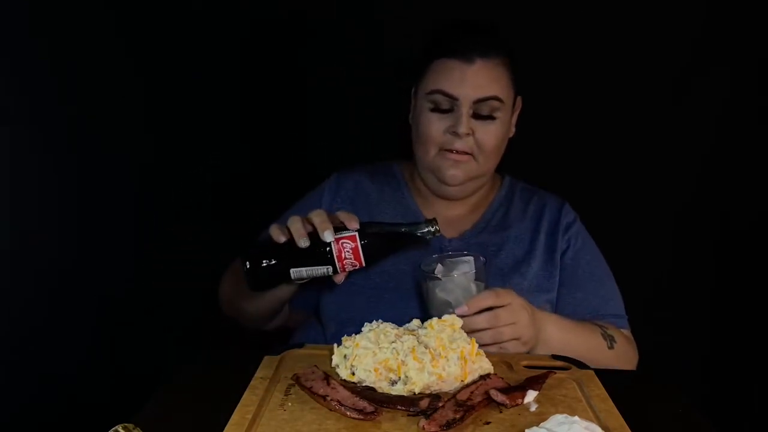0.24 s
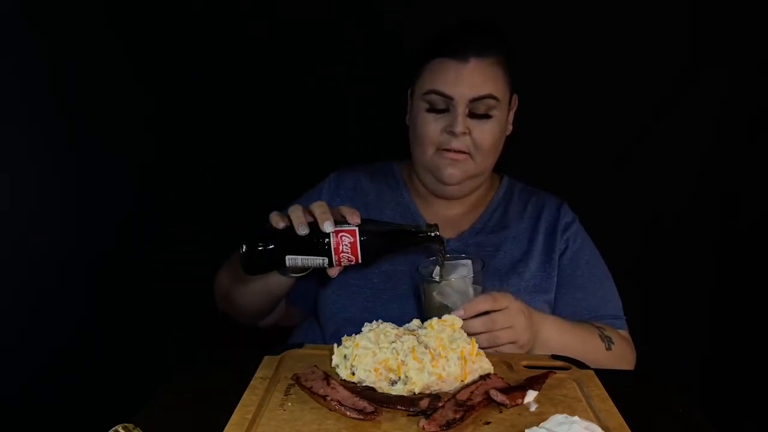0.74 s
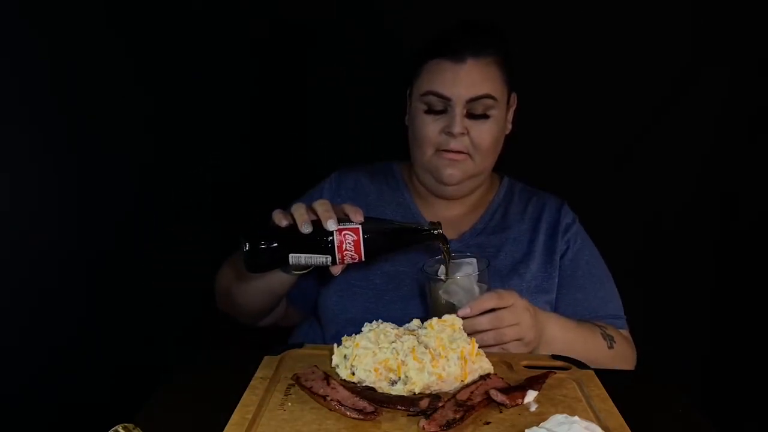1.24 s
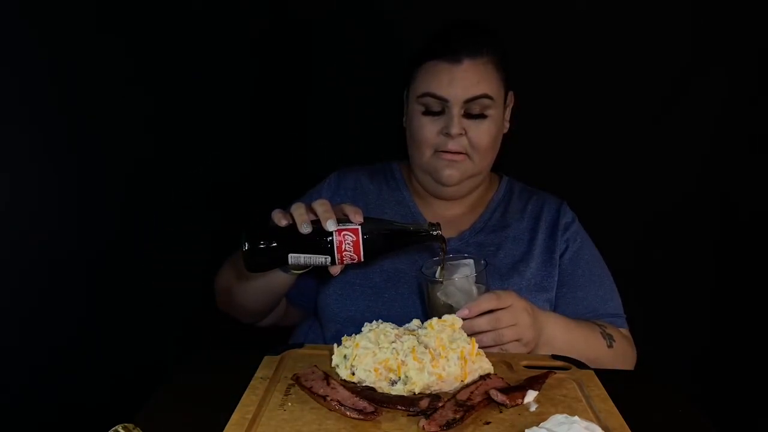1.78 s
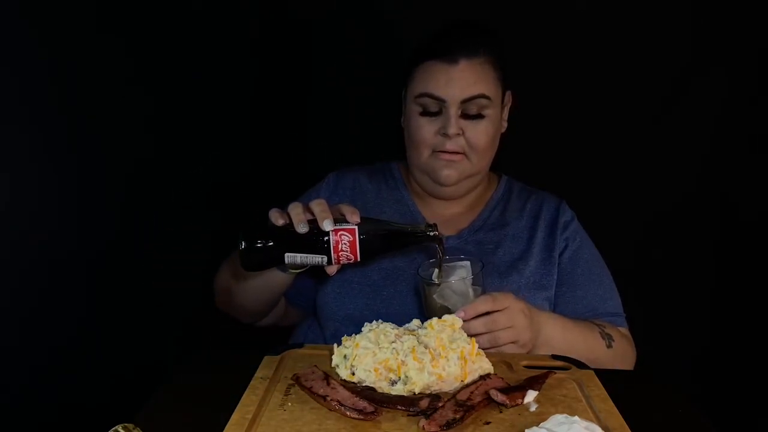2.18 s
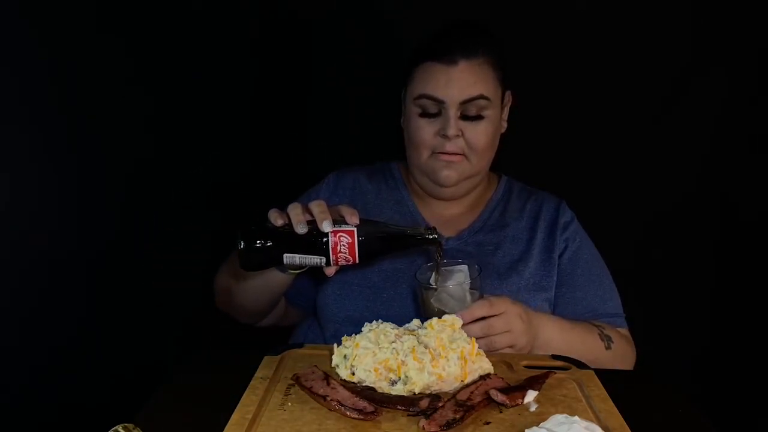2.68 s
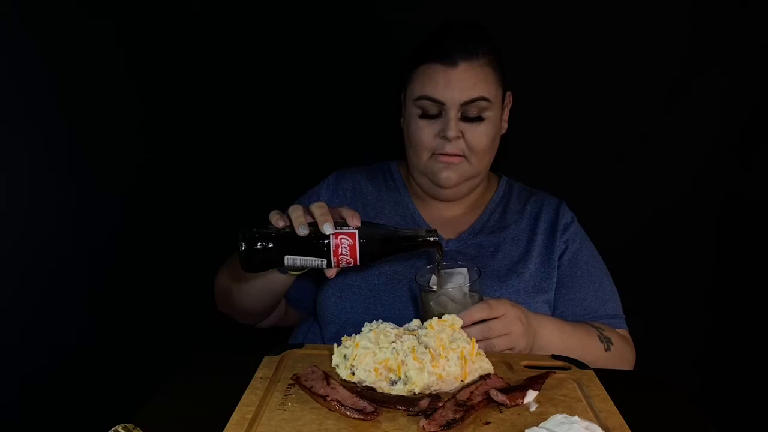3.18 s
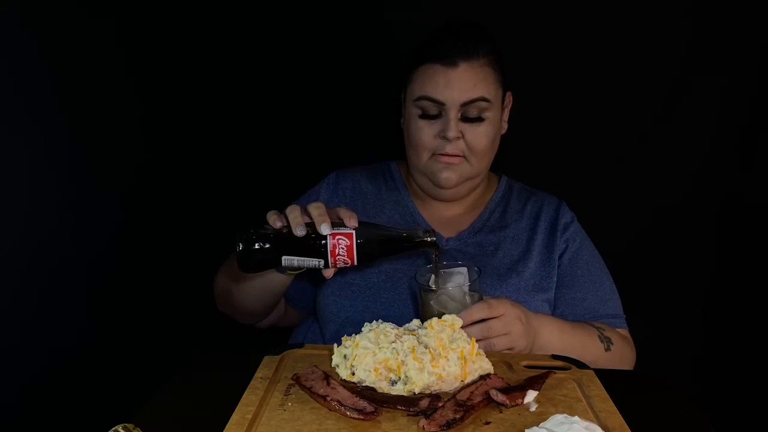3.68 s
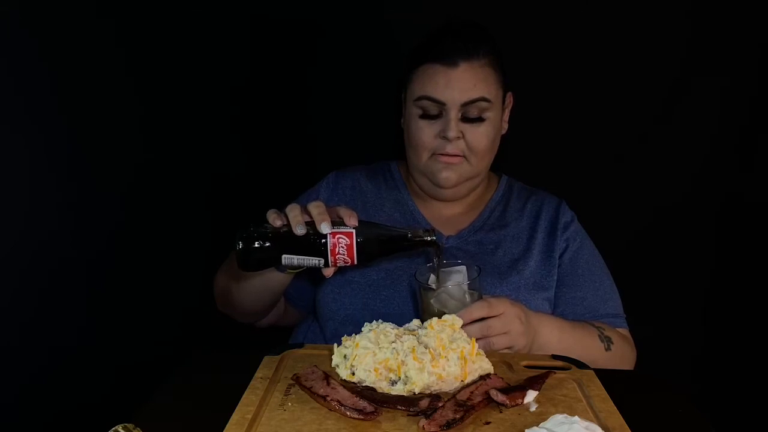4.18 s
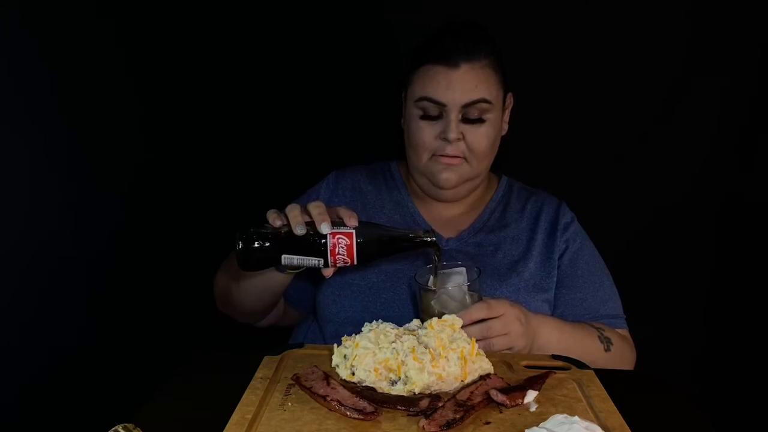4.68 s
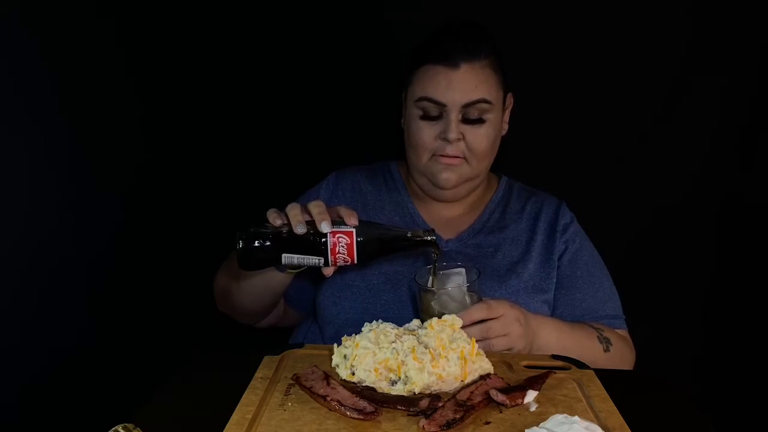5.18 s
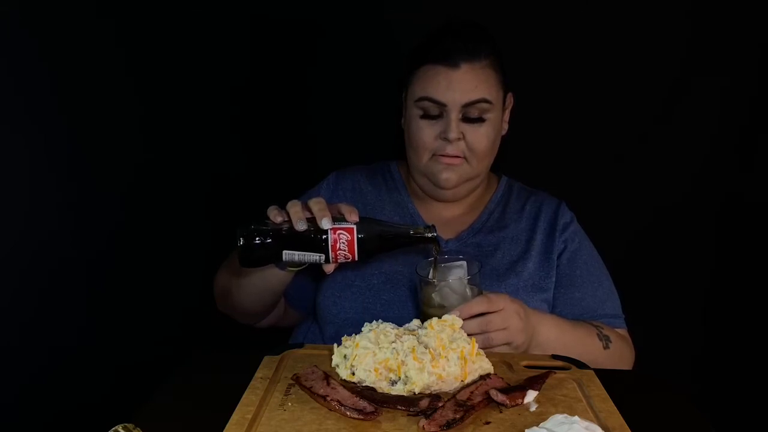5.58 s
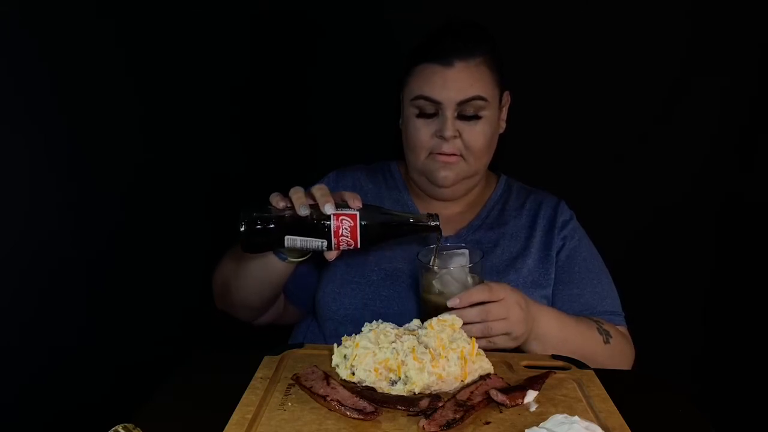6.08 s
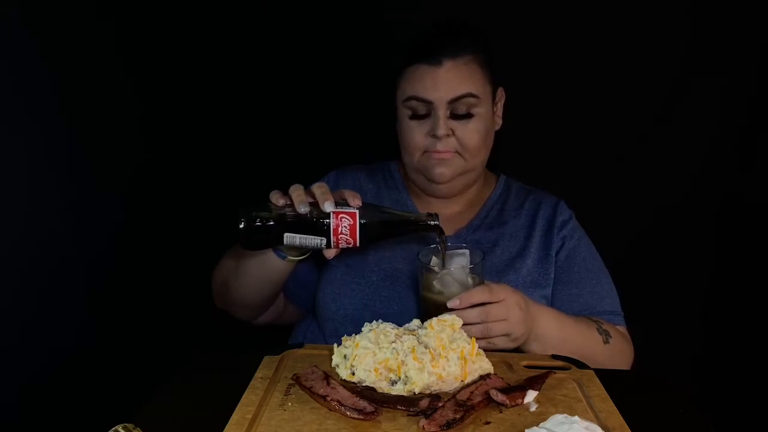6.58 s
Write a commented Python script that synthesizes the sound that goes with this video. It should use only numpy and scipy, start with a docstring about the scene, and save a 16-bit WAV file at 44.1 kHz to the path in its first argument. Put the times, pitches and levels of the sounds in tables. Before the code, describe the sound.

In a quiet room with a deep steady appliance hum, a seat creaks several times in quick raspy knocks. A fizzy drink then starts to pour over ice in a glass: small plops, sharp ice cracks and a thin hiss that grows into a dense bubbling fizz. Cubes knock and tick as they settle. Close microphone, short dry room, no speech.

```python
"""Fizzy drink poured over ice

A fizzy drink is poured slowly from a glass bottle over ice in a tumbler, in a quiet room with humming appliances.
Steady tones and air noise hum; a seat creaks in slips of rasping noise and knocking frame modes.
Random bursts through narrow bands make the fizz, its colour passing through lifts and hollows.
Ice cracks and knocks as dying sines, drops plop as short rising tones, and a noise tail gives the room."""
import sys
import numpy as np
from scipy import signal
from scipy.fft import rfft, irfft, next_fast_len
from scipy.io import wavfile

SR = 44100
rng = np.random.default_rng(int(sys.argv[2]) if len(sys.argv) > 2 else 0)


def wav_record(signal):
    """Record a signal, one row per channel, as 16-bit PCM in the file named by sys.argv[1]."""
    frames = np.transpose(np.atleast_2d(signal))
    bounded = np.clip(frames, -1, 1)
    # unit amplitude maps onto the largest positive 16-bit level
    quanta = np.round(bounded * 32767).astype(np.int16)
    wavfile.write(sys.argv[1], SR, quanta)


N = 301423
TIME = np.arange(N) / SR
STEP = 40   # samples between points of slow curves
COARSE = TIME[::STEP]


def amp(db):
    """Gain of a level in dB."""
    return 10 ** (np.asarray(db) / 20)


def rms_one(x):
    """Scales a sound to rms 1."""
    return x / np.sqrt(np.mean(x ** 2) + 1e-20)


def smooth_gain(coarse_db):
    """Gain at every sample from levels on the coarse grid."""
    return np.interp(TIME, COARSE, amp(coarse_db))


def drift(rate_hz):
    """Slow random wander on the coarse grid, rms 1, from noise through two equal low-pass poles."""
    pole = np.exp(-2 * np.pi * rate_hz * STEP / SR)
    settle = 2000   # points run in and thrown away
    slow = signal.lfilter([1], [1, -2 * pole, pole * pole], rng.standard_normal(len(COARSE) + settle))
    return rms_one(slow[-len(COARSE):])


def coloured_noise(spectrum, size):
    """Noise with a given spectrum, drawn over log frequency; rms 1."""
    hz, db = np.transpose(spectrum)
    grid = np.fft.rfftfreq(size, 1 / SR) + 1   # 1 Hz up, to keep the log finite
    gain = amp(np.interp(np.log(grid), np.log(hz), db))
    return rms_one(irfft(rfft(rng.standard_normal(size)) * gain, size))


def ring(t, hz, t60):
    """A sine that dies by 60 dB in t60 seconds."""
    return np.sin(2 * np.pi * hz * t) * amp(-60 * t / t60)


def add(out, s, sound):
    """Mixes a short sound in at a time in seconds."""
    at = round(s * SR)
    out[at:at + len(sound)] += sound[:N - at]


# Steady tones of mains, motor and fans. Each row: frequency in Hz, mean rms level in dB.
HUM_TONES = [(17.2, -31), (17.95, -37), (37.5, -47), (59.95, -45), (85.7, -49), (120, -51.5), (149.4, -59),
             (161.5, -61), (170.2, -57), (171.4, -55), (181, -57), (186.5, -60), (227, -59), (240, -45.3),
             (284, -56), (298.6, -58), (336, -62), (360, -60), (385, -61), (448, -58), (480, -62),
             (560, -67), (585, -63), (738, -67)]
# Spectrum of air and building noise. Each row: frequency in Hz, relative level in dB per Hz.
AIR_SPECTRUM = [(8, -2.5), (22, -2.5), (30, -1), (40, -17.5), (70, -15), (95, -19), (135, -32.5),
                (175, -21), (210, -26.5), (300, -27), (450, -30.5), (590, -34), (800, -35), (1200, -40),
                (3000, -44), (6000, -62), (9000, -63), (15500, -72)]
# Brief dips in the level of the low hum near 57 Hz. Each row: centre in seconds, depth in dB (negative).
LOW_HUM_DIPS = [(0.55, -14), (1.62, -13), (2.758, -4), (5.5, -6.5), (6.13, -11)]
LOW_HUM_HZ, LOW_HUM_DB = 56.75, -29.5
DIP_S = 0.057   # from the centre of a dip to 1/e of its depth
FLUTTER_HZ, FLUTTER_WIDTH_HZ, FLUTTER_DB = 58.85, 3.2, -45
AIR_DB = -31.5


def hum():
    """Low motor hum whose level dips briefly, wavering mains and fan tones, and broad air noise."""
    low_db = LOW_HUM_DB + sum(db * np.exp(-((COARSE - s) / DIP_S) ** 2) for s, db in LOW_HUM_DIPS)
    out = np.sqrt(2) * smooth_gain(low_db) * np.sin(2 * np.pi * LOW_HUM_HZ * TIME)
    # a narrow unsteady rumble beats against the low hum
    edges = [FLUTTER_HZ - FLUTTER_WIDTH_HZ / 2, FLUTTER_HZ + FLUTTER_WIDTH_HZ / 2]
    band = signal.butter(2, edges, "band", fs=SR, output="sos")
    rumble = signal.sosfilt(band, rng.standard_normal(N + SR))[SR:]   # the first second settles the filter
    out += amp(FLUTTER_DB) * rms_one(rumble)
    for hz, db in HUM_TONES:
        waver = smooth_gain(db + 0.9 * drift(1.2))
        out += np.sqrt(2) * waver * np.sin(2 * np.pi * (hz * TIME + rng.random()))
    return out + amp(AIR_DB) * coloured_noise(AIR_SPECTRUM, next_fast_len(N))[:N]


# Creaks of the seat, and a short rasp at 1.28 s as the drink rises. Each row: start in seconds,
# base level in dB, knock level relative to base in dB, build-up in seconds, catch level in dB,
# treble lift of the rasp in dB.
CREAKS_AND_RASP = [(0, -27, 3, 0.0061, -50, -6), (0.0596, -27, 4.5, .007, -46, -1.5),
                   (0.1185, -32, 10.5, 0.0056, -42, 0), (.167, -33, 9, 0.0069, -39, 0),
                   (0.212, -35.5, 10, 0.0079, -38, 0.5), (.394, -30, 3.5, 0.0031, -37, -0.5),
                   (0.519, -42, 4, 0.0034, -60, -4), (1.284, -37, -25, 0.0039, -52, 4),
                   (4.245, -31, -13, 0.0085, -50, 0)]
# Modes of the seat frame. Each row: frequency in Hz, relative level in dB, t60 in seconds.
FRAME_MODES = [(246.5, -3.5, 0.28), (340, -5.5, 0.071), (431, -2, 0.085), (480, -1, 0.054),
               (570, -2, 0.068), (675, -10, 0.032), (1400, -16, 0.04), (2430, -20, 0.05)]
# Spectrum of the rasp. Each row: frequency in Hz, relative level in dB per Hz.
RASP_SPECTRUM = [(250, 8), (600, 3), (950, -6), (1400, 2.5), (1900, -2.5), (2400, -3.5), (4200, -11),
                 (5200, -9.5), (6300, -0.5), (7000, -7), (7650, -3.5), (8400, -4), (9300, -7.5),
                 (10100, -6.5), (10900, -10.5), (11700, -6.5), (13000, -15), (15800, -18)]
CATCH_HZ, CATCH_T60_S = [5240, 5500, 6000], 0.0054
RASP_TREBLE_HZ, RASP_HOLD_S = 3500, 0.0012
KNOCK_DELAY_S = 0.0062   # the knock follows just after the rasp begins


def creaks_and_rasp():
    """Each creak builds up as a rasp of noise and a knock on the frame's modes, then catches with a tick.

    The short rasp of the drink is made the same way, with its knock and tick very faint."""
    out, t = np.zeros(N), TIME[:SR // 4]
    for s, db, knock_db, build_s, catch_db, treble_db in CREAKS_AND_RASP:
        rise = np.clip(t / build_s, 0, 1) ** 0.76
        after = np.maximum(t - build_s - RASP_HOLD_S, 0)
        # a quick fall over a longer tail
        envelope = rise * (amp(-60 * after / 0.036) + 0.78 * amp(-60 * after / 0.29))
        colour = [(hz, level_db + treble_db * (hz > RASP_TREBLE_HZ)) for hz, level_db in RASP_SPECTRUM]
        rasp = coloured_noise(colour, len(t)) * envelope
        uneven_db = rng.normal(0, 2, len(FRAME_MODES))
        frame = sum(amp(mode_db + e) * ring(t, hz, t60) for (hz, mode_db, t60), e in zip(FRAME_MODES, uneven_db))
        knock = 0.5 * frame * (1 - np.exp(-t / 0.00085))
        tick = sum(ring(t, hz, CATCH_T60_S) for hz in CATCH_HZ)
        add(out, s, amp(db - 7.0) * rasp)
        add(out, s + KNOCK_DELAY_S, amp(db + knock_db) * knock)
        add(out, s + build_s, amp(catch_db) * tick)
    return out


# Passing lifts and hollows in the fizz's colour, some climbing as the glass fills. Each row:
# start in seconds, end in seconds, starting frequency in Hz, climb in octaves per second (negative falls),
# width in octaves from the centre to 1/e, lift in dB (negative makes a hollow).
FIZZ_COLOURS = [(0.61, 1.3, 5800, 0.011, 0.65, -6.5), (0.71, 3.7, 1170, 0.11, 0.084, 7),
                (1, 4.6, 2200, 0.038, 0.054, 0.5), (1.9, 3, 1950, 0.046, 0.056, -14),
                (3.03, 7.2, 1020, 0.15, 0.17, 4), (5.4, 7.2, 2380, 0.049, 0.052, 4),
                (1.73, 2.3, 1650, 0.01, 0.05, 5.5), (4.9, 7.2, 6100, 0.004, 0.095, 4.5),
                (6.7, 7.2, 13000, 0.01, 0.13, -3), (2, 2.75, 3200, 0.02, 0.06, 3.5),
                (4.2, 5.1, 3520, 0.01, 0.05, -6), (2.5, 3.7, 4480, 0.034, 0.07, 3),
                (3.9, 7.2, 3870, 0.04, 0.085, 2.5), (4.4, 5.2, 3400, 0.02, 0.077, 3.5),
                (2.2, 3.9, 920, 0.1, 0.11, 7.5), (0.8, 2.04, 2950, 0.02, 0.06, 2),
                (3.3, 5, 2300, 0.02, 0.07, 2), (5.9, 7.2, 2800, 0.057, 0.062, 4),
                (1.6, 2.5, 6600, 0.025, 0.06, 2), (5.3, 7.2, 7900, 0.005, 0.06, 3.5),
                (3.6, 6.8, 10400, -0.002, 0.11, 3.5), (3.1, 4.3, 1520, 0.02, 0.08, 1.5),
                (4, 5.3, 1520, -0.064, 0.1, 1.5), (4.3, 4.9, 1710, 0.01, 0.073, -1.5),
                (1.8, 3.2, 3680, 0.033, 0.06, 2.5), (1.1, 2.13, 3430, 0.01, 0.07, -4),
                (4.8, 7.2, 4540, 0.085, 0.11, 1), (0.9, 2.2, 5900, -0.007, 0.1, 1.5)]
COLOUR_FADE_S = 0.12


def colour_db(hz):
    """Passing lift or hollow of the fizz at a frequency over time, each fading across its start and end."""
    total_db = 0
    for start, end, start_hz, climb, octaves, db in FIZZ_COLOURS:
        off_centre = np.log2(hz / start_hz) - climb * (COARSE - start)
        inside_s = np.minimum(COARSE - start, end - COARSE)
        fade = np.clip(inside_s / COLOUR_FADE_S + 0.5, 0, 1)
        total_db = total_db + db * np.exp(-(off_centre / octaves) ** 2) * fade
    return total_db


# The pour. Each row: time in seconds, then the levels of large bubbles, middle bubbles and fine spray in dB.
POUR_LEVELS = [(0.55, -59, -73, -61), (0.63, -59, -61, -53), (0.72, -56, -58.5, -46.5),
               (1.0, -52.5, -53.5, -47), (1.3, -50, -50.5, -46.5), (1.6, -48.5, -50, -48),
               (1.94, -51, -48, -47.5), (2.35, -47, -47, -47), (2.8, -44.5, -45.5, -45),
               (3.12, -44, -45, -46.5), (3.55, -45, -45, -46.5), (4.0, -42.5, -43.5, -47),
               (4.25, -42, -41, -46.5), (4.58, -37, -41.5, -47.5), (4.67, -35, -42.5, -47.5),
               (4.75, -39, -42, -47.5), (4.81, -37, -41, -47), (4.95, -36.5, -41.5, -47),
               (5.03, -40, -41.5, -48), (5.4, -41, -40.5, -48.5), (5.97, -43.5, -41, -50),
               (6.4, -43.5, -40.5, -50), (6.83, -45, -39.5, -49)]
# Bands in which large bubbles ring. Each row: centre in Hz, width in Hz, relative level in dB.
LARGE_BANDS = [(928, 130, -22), (1036, 110, -15.5), (1094, 95, -11), (1177, 91, -10.5), (1245, 125, -8.5),
               (1307, 120, -7.5), (1405, 134, -6.5), (1482, 106, -6), (1578, 175, -2.5), (1671, 120, -3.5),
               (1768, 106, -6.5)]
# Bands in which middle bubbles ring. Each row: centre in Hz, width in Hz, relative level in dB.
MIDDLE_BANDS = [(1928, 200, -4), (2118, 137, -6), (2290, 130, -3), (2394, 116, -2.5), (2533, 160, -3),
                (2693, 150, -8), (2854, 146, -7), (3014, 154, -7), (3165, 157, -5.5), (3310, 150, -5.5),
                (3476, 210, -11), (3656, 140, -9.5), (3836, 170, -6.5), (4024, 200, -6.5), (4250, 210, -7),
                (4480, 240, -7.5), (4730, 230, -8.5), (4980, 250, -10.5), (5220, 220, -12.5)]
# Bands in which the fine spray rings. Each row: centre in Hz, width in Hz, relative level in dB.
FINE_BANDS = [(5750, 740, -3), (6380, 780, 0.5), (6840, 620, 2), (7680, 400, -0.5), (8180, 590, 0),
              (8820, 330, -0.5), (9220, 340, -1), (9800, 1800, 1), (11300, 1750, -1), (12660, 550, -3.5),
              (13400, 1300, -3.5), (15100, 1200, -7)]
MID_POUR_S, POUR_ONSET_S = 3.7, 0.043


def bubbles(bands, level_db, per_s, spread_db, patchy_db, dulls_db):
    """Bubbles burst at random with uneven strength; neighbouring bands ring from two different swarms.

    per_s counts bursts in each swarm; dulls_db tilts the bands, in dB per octave and second (negative brightens)."""
    out, gush, since_mid = 0, drift(2.4), COARSE - MID_POUR_S
    bursts = rng.random((2, N)) < per_s / SR
    strength = rng.standard_normal((2, N)) * amp(spread_db * rng.standard_normal(N))
    swarms = bursts * strength
    for k, (hz, width, db) in enumerate(bands):
        edges = [hz - width / 2, min(hz + width / 2, 17000)]
        band = signal.butter(2, edges, "band", fs=SR, output="sos")
        tilt_db = -dulls_db * since_mid * np.log2(hz / bands[0][0])
        uneven_db = patchy_db * (gush + 3.2 * drift(3.1))   # shared gush and each band's own wander
        gain = smooth_gain(db + colour_db(hz) + tilt_db + uneven_db)
        out = out + gain * rms_one(signal.sosfilt(band, swarms[k % 2]))
    onset = np.clip((TIME - POUR_LEVELS[0][0]) / POUR_ONSET_S, 0, 1)
    return amp(level_db) * onset * rms_one(out)


def fizz():
    """Three sizes of bubble: the smaller, the more of them."""
    s, *columns = np.transpose(POUR_LEVELS)
    large_db, middle_db, fine_db = [np.interp(TIME, s, c) for c in columns]
    return (bubbles(LARGE_BANDS, large_db, 1500, spread_db=0.9, patchy_db=0.3, dulls_db=-0.93)
            + bubbles(MIDDLE_BANDS, middle_db, 5000, spread_db=-1.3, patchy_db=0.2, dulls_db=1.5)
            + bubbles(FINE_BANDS, fine_db, 12000, spread_db=1.5, patchy_db=0.25, dulls_db=-0.2))


# Ringing parts of the ice cracks; a strong crack takes several rows. Each row: start in seconds,
# base level in dB, centre in Hz, breadth in octaves, t60 in milliseconds.
CRACK_PARTS = [(.609, -42, 7000, .15, 7.5), (0.636, -39.5, 5600, 1.74, 10), (.663, -32, 6800, .12, 6.3),
               (0.693, -37, 5230, 1.6, 8.4), (.716, -27, 3320, 0.24, 9.7), (0.767, -29.5, 4240, 0.89, 6.5),
               (.8217, -40, 6000, .8, 7), (.864, -30, 3200, .15, 8.2), (1.108, -20, 8300, 0.18, 7.5),
               (1.14, -11, 8220, 0.14, 7), (1.181, -29, 8300, .2, 7.5), (1.3116, -36, 6800, .15, 7.5),
               (1.4126, -27, 5000, 1.72, 8.1), (1.4125, -22, 7600, 0.07, 11), (1.4144, -20, 9300, .08, 10),
               (1.8625, -28, 1500, 0.59, 6.4), (2.098, -33, 6800, .1, 12), (2.8665, -36, 1700, 0.32, 7.4),
               (2.907, -39, 2100, 0.62, 11), (2.9207, -27, 3350, 1.44, 9.1), (2.9208, -33, 9400, 0.091, 25),
               (2.922, -28, 3950, .1, 15), (2.9235, -43, 1880, 0.39, 11), (2.928, -16, 4450, 0.12, 13),
               (2.927, -34, 6650, .1, 10), (3.082, -28, 10100, .08, 10), (3.082, -33, 6600, .15, 8),
               (3.820, -25.5, 6600, 0.3, 5.2), (3.838, -36, 2600, .3, 8), (3.919, -20, 3600, 0.35, 7.8),
               (3.997, -18, 3600, 0.34, 7.6), (4.3355, -13.5, 8300, 0.81, 5.5),
               (6.404, -34, 6550, 0.11, 7.5), (6.429, -28, 6750, 0.11, 7.5), (6.530, -30, 6760, 0.28, 7.5),
               (6.606, -24, 2570, 0.28, 7.5)]
# Cubes knocking as they settle. Each row: start in seconds, base level in dB, frequency in Hz,
# cycles until the ring is 60 dB down.
ICE_KNOCKS = [(1.414, -39.5, 770, 27), (1.8625, -39.5, 785, 21), (2.867, -32, 840, 12),
              (2.905, -37, 170, 2.5), (2.9059, -24, 294, 3), (2.9066, -16, 840, 2.6),
              (2.9203, -21.5, 397, 2.8), (3.106, -33, 126, 3), (4.027, -21.5, 310, 2.4),
              (4.029, -22, 1110, 4.3)]
# Modes of the ice. Each row: frequency in Hz, relative level in dB.
ICE_MODES = [(1300, 6), (1700, 3), (2030, 7), (2630, 5), (3130, -5.5), (3950, -6.5), (4400, -19),
             (5850, -11), (6650, 2.5), (7050, 3), (7550, -6.5), (8420, -10.5), (9400, -8.5), (10200, -4.5),
             (11600, -9)]
SNAP_DB, SNAP_DB_PER_OCTAVE = -32, 24.5   # the broader the part, the louder its bare snap
GLASS_ECHO_S, GLASS_ECHO_DB = 0.0016, -8


def ice():
    """Crack parts are a bare snap and the ice's modes near a centre, echoing off the glass; knocks are dull swings."""
    out, t = np.zeros(N), TIME[:SR // 25]
    for s, db, centre_hz, octaves, t60_ms in CRACK_PARTS:
        modes = 0
        for hz, mode_db in ICE_MODES:
            nearness = np.exp(-(np.log2(hz / centre_hz) / octaves) ** 2)
            modes = modes + amp(mode_db) * nearness * ring(t, hz, t60_ms / 1000)
        tone = (1 - np.exp(-t / 0.00059)) * modes
        # a sharp pulse with a little dying noise
        snap = -np.exp(-t / 0.00007) + 0.18 * rng.standard_normal(len(t)) * amp(-60 * t / 0.013)
        snap_db = db + SNAP_DB + SNAP_DB_PER_OCTAVE * octaves
        add(out, s, amp(db + 2.5) * tone + amp(snap_db) * snap)
        add(out, s + GLASS_ECHO_S, amp(db + GLASS_ECHO_DB) * tone)
    for s, db, hz, cycles in ICE_KNOCKS:
        soft_start = 1 - np.exp(-t / 0.0014)
        add(out, s, -amp(db + 12.0) * soft_start * ring(t, hz, cycles / hz))
    return out


# Short rising tones: drops, and the hollow body of a crack (at 2.92 s). Each row: start in seconds,
# peak level in dB, nominal pitch in Hz.
RISING_TONES = [(0.635, -22.5, 1620), (.692, -21, 1660), (1.19, -39, 1250), (1.683, -38, 1250),
                (1.759, -39, 1250), (2.8005, -34, 1380), (2.866, -29, 1430), (2.882, -39, 1430),
                (2.9062, -33, 1460), (2.9218, -23, 1405), (3.304, -30.5, 1530), (3.616, -29, 1560),
                (4.244, -31, 1460), (4.335, -26.5, 1590), (6.605, -27, 2630)]
TONE_CYCLES = 10.7   # length of a tone in cycles of its nominal pitch


def rising_tones():
    """Short swelling sines that rise in pitch, as the trapped air of a drop sings."""
    out = np.zeros(N)
    for s, db, hz in RISING_TONES:
        u = TIME[:round(TONE_CYCLES / hz * SR)] * hz / TONE_CYCLES   # 0 to 1 through the tone
        swell = np.sin(np.pi * u ** 0.53) ** 2
        cycles = TONE_CYCLES * (0.956 * u + 0.05 * u ** 2)
        add(out, s, amp(db) * swell * np.sin(2 * np.pi * cycles))
    return out


ROOM_T60_S = 0.24
FIZZ_ROOM_DB, TAP_ROOM_DB = -13.5, -15


def room(x, wet_db):
    """Adds a tail of dying noise, duller than the direct sound."""
    t = TIME[:SR // 2]
    dull_noise = signal.lfilter([0.5], [1, -0.5], rng.standard_normal(len(t)))
    tail = dull_noise * amp(-60 * t / ROOM_T60_S) * (t > 0.004)   # a short gap before the tail
    return x + amp(wet_db) * signal.fftconvolve(x, tail / np.sqrt(np.sum(tail ** 2)))[:N]


def scene():
    """Short sounds and fizz ring in the room; the hum already fills it."""
    taps = room(rising_tones() + ice() + creaks_and_rasp(), TAP_ROOM_DB)
    return (taps + room(fizz(), FIZZ_ROOM_DB) + hum())[None]


CUTOFF_HZ = 16100


def record(dry):
    """A steep low-pass cuts the top, 70 dB down from the cutoff up."""
    return signal.sosfilt(signal.cheby2(20, 70, CUTOFF_HZ, fs=SR, output="sos"), dry)


dry = scene()
out = record(dry)
wav_record(out)
```